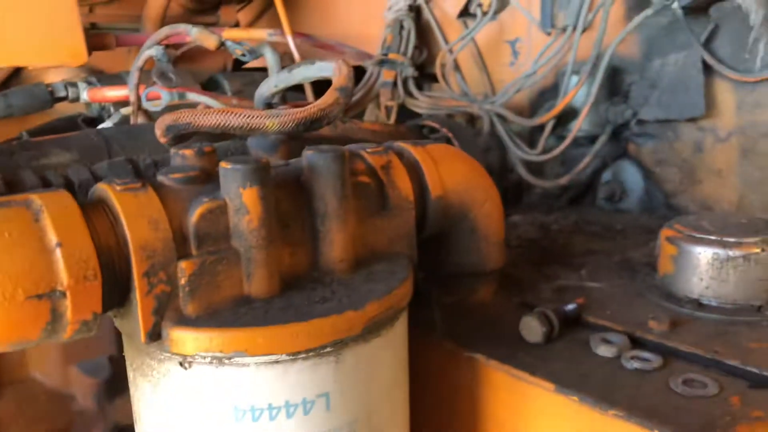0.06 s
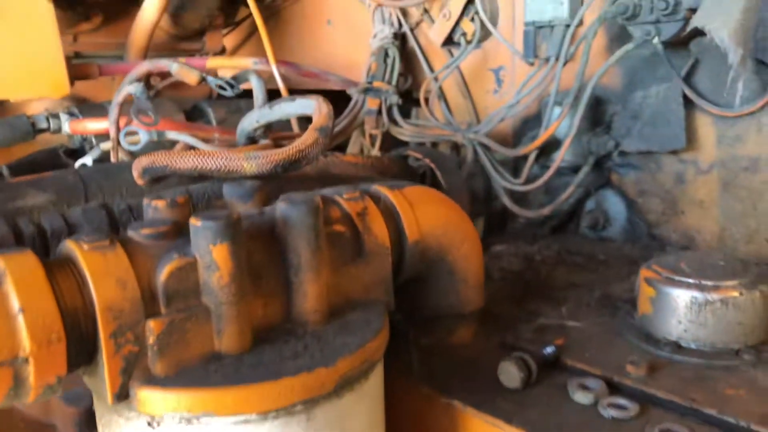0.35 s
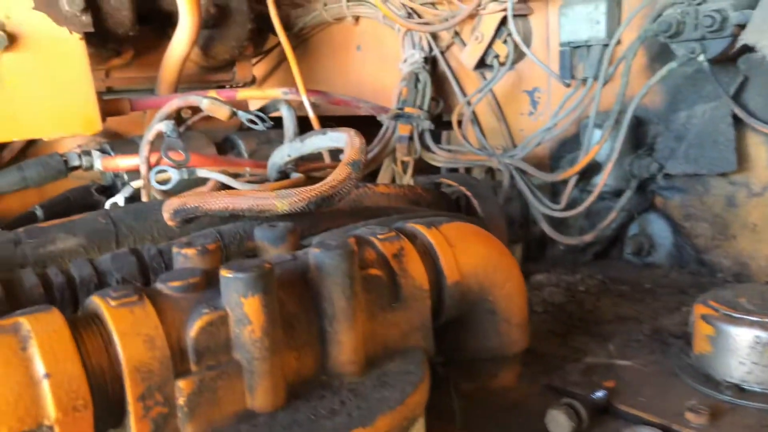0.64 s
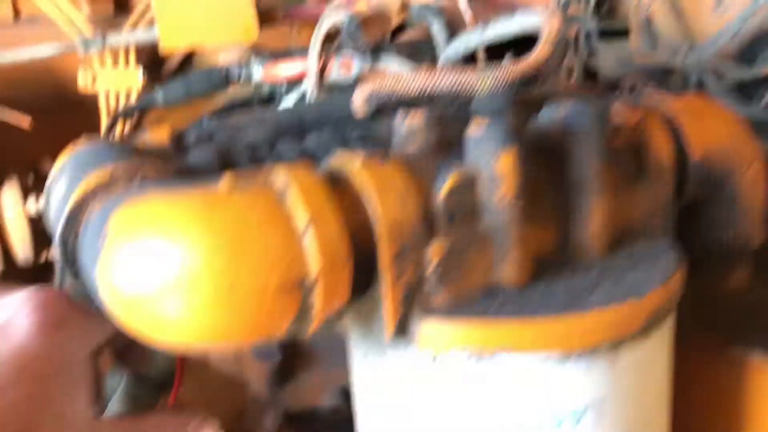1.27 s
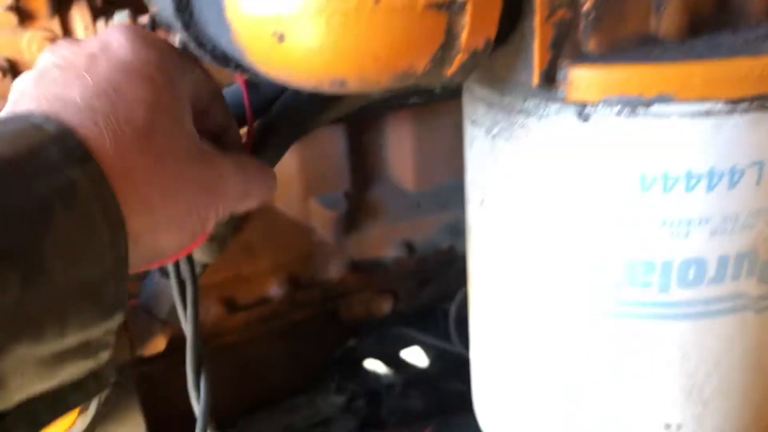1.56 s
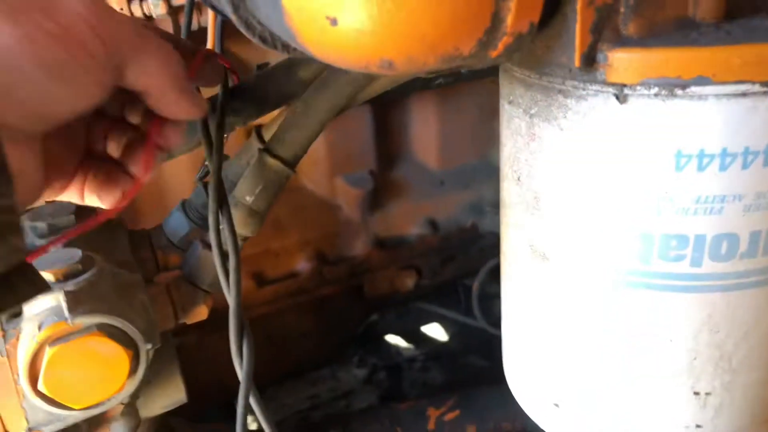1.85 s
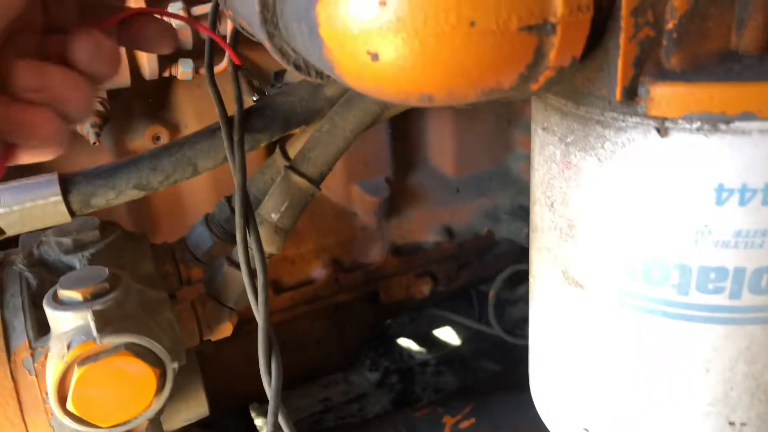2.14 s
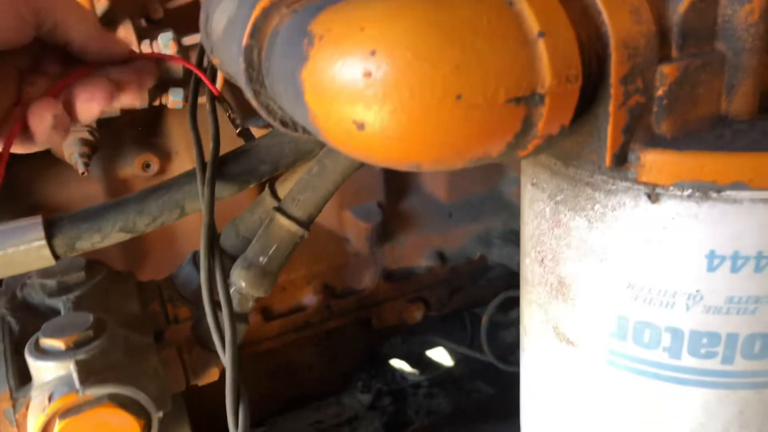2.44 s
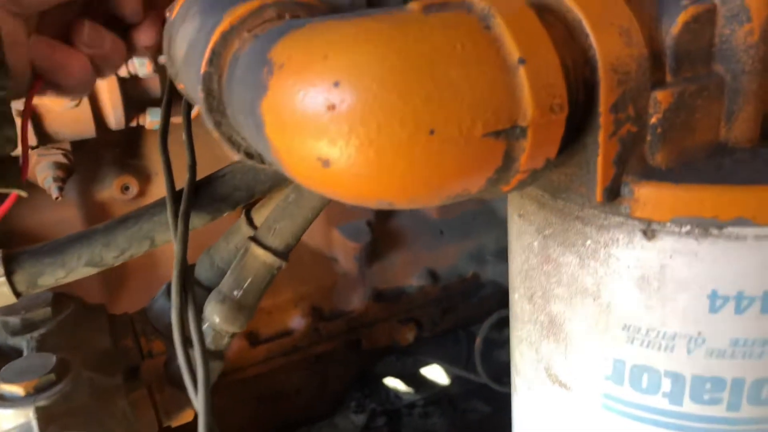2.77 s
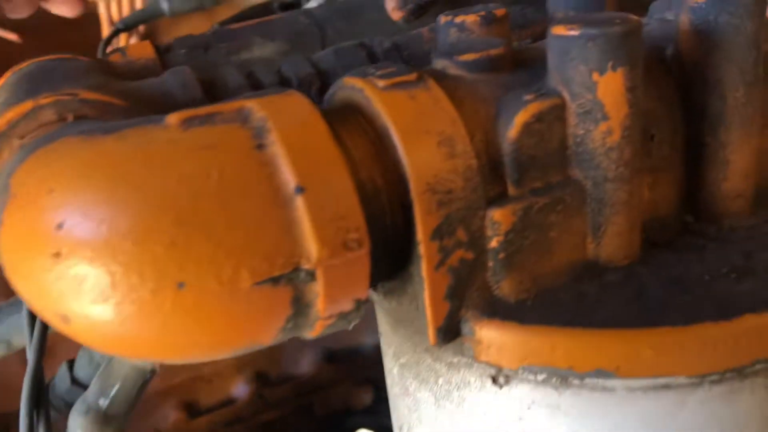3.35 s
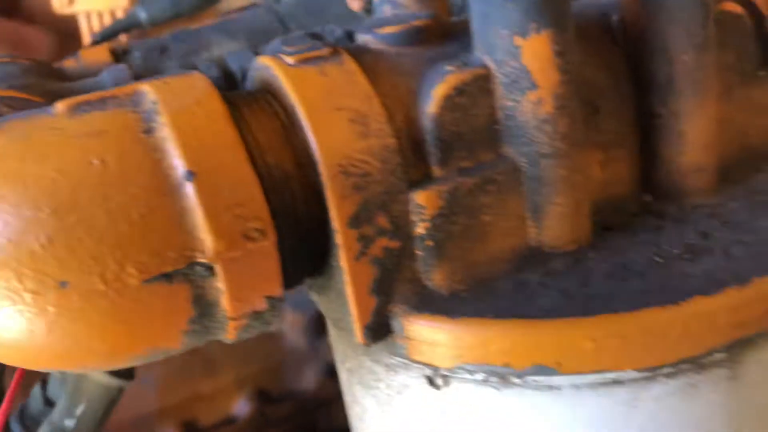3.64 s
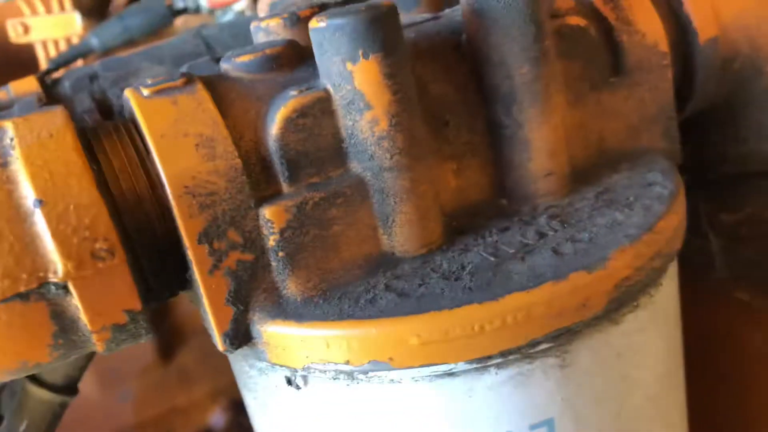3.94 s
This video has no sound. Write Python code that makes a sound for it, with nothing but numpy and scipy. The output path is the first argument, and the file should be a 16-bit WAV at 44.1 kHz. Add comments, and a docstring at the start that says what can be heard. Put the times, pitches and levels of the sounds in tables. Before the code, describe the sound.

A diesel engine idles with a low, wavering drone while a hand makes faint ticks and rustles with wires. Then a loud hiss surges, eases and keeps rushing, heard close up in the open engine bay.

```python
"""A diesel engine drones at a wandering idle in an open bay, heard in mono as the microphone moves about.
Its tones are harmonics of the four-stroke cycle, over rumble, mechanical noise and a faint whine.
A hand fiddles with wires, making faint ticks and rustles. Then a loud jet of broadband hiss swells,
eases and keeps rushing, exciting faint resonances in the surrounding metal."""
import sys
import numpy as np
from scipy import signal
from scipy.fft import rfft, irfft
from scipy.io import wavfile

SR = 44100
rng = np.random.default_rng(int(sys.argv[2]) if len(sys.argv) > 2 else 0)


def output_pcm(signal):
    """Save a mono or channel-first signal as 16-bit PCM at the path in sys.argv[1].

    Samples are clipped to [-1, 1] before scaling.
    """
    pcm = np.clip(np.atleast_2d(signal).T, -1, 1) * 32767
    wavfile.write(sys.argv[1], SR, np.round(pcm).astype(np.int16))


N = 176400
TIME = np.arange(N) / SR
CUTOFF_HZ = 15780


# idle speed: (time [s], four-stroke cycle rate [Hz])
CYCLE_RATE = [(0,9.15),(.3,9.85),(.5,10.22),(.7,10.25),(1.1,10.6),(1.7,11.0),(2.1,11.15),(2.3,11.23),(2.5,11.12),(3.1,10.24),(3.6,10.06),(4,9.9)]

def engine(jitter=0.0021):
    """Periodic excitation: the cycle phase, the integral of speed, times the drone and the firings."""
    cycle_hz = in_time(CYCLE_RATE)[0] * (1 + jitter * drift(6))
    cycle_phase = 2 * np.pi * np.cumsum(cycle_hz) / SR
    return drone(cycle_phase) + rumble() + clatter(cycle_phase)


# orders 8 and 12, the strong overtones of the firing rate: (time [s], level [dB])
ORDER_8_LEVEL = [(0,-66),(.45,-53),(.7,-42.5),(1.1,-45),(1.55,-47.5),(1.85,-32.5),(2.15,-31.5),(2.4,-26),(2.6,-37),(2.82,-31),(3.05,-40.5),(3.35,-32.5),(3.7,-29),(4,-31.5)]
ORDER_12_LEVEL = [(0,-54),(.8,-44),(1,-41),(1.27,-33.5),(1.65,-42.5),(2,-44.5),(2.5,-49),(2.82,-35),(3.1,-41.5),(3.4,-39),(4,-35)]
# weaker orders from uneven cylinders: (order, level at place 0 [dB], at place 1 [dB], at place 2 [dB])
WEAK_ORDERS = [(5,-72,-44,-71),(6,-61,-50.5,-59),(7,-70,-54,-64),(9,-56,-55,-43),(10,-61,-48.5,-45.5),(11,-53,-54.5,-41),(13,-63,-77,-47),(14,-45,-55,-59),(15,-49,-65.5,-48),(16,-65,-65,-46),(17,-70,-63,-59),(22,-70,-66,-71),(24,-65,-74,-66),(25,-67,-73,-66)]
# path of the microphone: (time [s], place [index])
MICROPHONE_PATH = [(0,0.12),(.8,0.46),(1.3,0.82),(2,0.92),(2.6,0.87),(3.25,1.76),(4,2.1)]

def drone(cycle_phase, wander_rad=0.26, waver_hz=2.5):
    """Harmonic series: orders are multiples of the cycle rate; dispersed phases smooth their sum."""
    def harmonic(order, db, waver_db):
        offset = np.pi * order ** 2 / len(WEAK_ORDERS) + wander_rad * drift(waver_hz)
        amplitude = np.sqrt(2) * from_db(db + waver_db * drift(waver_hz))
        return amplitude * np.sin(order * cycle_phase + offset)

    place, = in_time(MICROPHONE_PATH)
    out = harmonic(8, in_time(ORDER_8_LEVEL)[0], waver_db=0.67)
    out += harmonic(12, in_time(ORDER_12_LEVEL)[0], waver_db=0.67)
    for order, *levels in WEAK_ORDERS:
        out += harmonic(order, np.interp(place, [0, 1, 2], levels), waver_db=2.0)
    return out


# spectrum of the rumble before its low-pass: (frequency [Hz], relative level [dB])
RUMBLE_SPECTRUM = [(25,-32),(45,-25),(60,-14),(76,-2.5),(92,-0.5),(120,0),(145,-8),(175,-22),(300,-55)]
# envelope of the rumble: (time [s], level [dB])
RUMBLE_LEVEL = [(0,-41.5),(.6,-39),(1.1,-43.5),(1.8,-48),(2.4,-46),(2.75,-41.5),(3.2,-40),(4,-40)]

def rumble(top_hz=400):
    """Aperiodic vibration: the engine's irregular motion gives a continuous band of bass."""
    low_pass = signal.butter(2, top_hz, fs=SR, output="sos")
    return signal.sosfilt(low_pass, noise(RUMBLE_SPECTRUM)) * from_db(in_time(RUMBLE_LEVEL)[0])


# mechanical noise of the engine: (frequency [Hz], relative level [dB])
CLATTER_SPECTRUM = [(150,-10),(200,-4.5),(222,-6),(243,2),(275,-6),(330,-5),(395,-6),(440,-12.5),(540,-10.5),(590,-14),(750,-12),(840,-17.5),(1500,-17),(2240,-25.5),(2900,-29),(3500,-26.5),(4100,-31.5),(5600,-32),(7400,-40),(15500,-45.5)]

def clatter(cycle_phase, level_db=-54, pulse_db=0.5, low_hz=162):
    """Amplitude modulation: mechanical noise pulses slightly at each of four firings per cycle."""
    carrier = rms_one(high_pass(noise(CLATTER_SPECTRUM), low_hz))
    return carrier * from_db(level_db + pulse_db * np.sin(4 * cycle_phase))


# spectrum of the jet: (frequency [Hz], relative level [dB])
JET_SPECTRUM = [(200,-15),(300,-9.5),(500,-9.5),(750,-7.5),(1250,-5),(1500,-2),(1950,-0.5),(2200,-4.5),(2420,-4),(2700,-4),(3100,-3),(3800,-1.5),(5900,-.5),(8000,-2),(10000,-2.5),(11500,-5),(14000,-3.5),(15500,-3.5)]
# centres of four overlapping bands: (frequency [Hz])
JET_BANDS = [600, 1600, 4800, 11500]
# relative band envelopes: (time [s], low [dB], middle [dB], treble [dB], top [dB])
JET_LEVELS = [(2.27,-99,-90,-87,-88),(2.32,-80,-74,-58,-61),(2.385,-60,-49,-42.5,-36),(2.425,-48,-44.5,-34,-30),(2.5,-36.5,-37,-27.5,-25.5),(2.58,-39,-32,-24.5,-23),(2.64,-33.5,-28.5,-21.5,-21.5),(2.74,-36,-32,-23,-25.5),(2.87,-38,-36,-26.5,-28.5),(3.02,-40.5,-39.5,-32,-38.5),(3.22,-41,-42.5,-38,-38.5),(3.41,-38,-41.5,-38,-33.5),(3.55,-40,-44,-38,-38.5),(3.68,-42,-43.5,-38.5,-38.5),(3.77,-45,-43.5,-36,-37.5),(3.88,-42.5,-44,-38,-37.5),(4,-42,-45,-35.5,-34)]

def jet(low_hz=200, band_gains_db=(8.7, 9.2, 1.65, 2.3), band_waver_db=0.5, flutter_db=0.15):
    """Jet noise: a broadband hiss opens treble first, surges and settles to a weaker flow."""
    spectrum = rfft(engine_bay(high_pass(noise(JET_SPECTRUM), low_hz)))
    log_hz = np.log(np.maximum(np.arange(len(spectrum)) * SR / N, 1))
    out = np.zeros(N)
    for selector, level, gain_db in zip(np.eye(len(JET_BANDS)), in_time(JET_LEVELS), band_gains_db):
        crossfade = np.interp(log_hz, np.log(JET_BANDS), selector)
        band = irfft(spectrum * crossfade, N)
        out += band * from_db(level + gain_db + band_waver_db * drift(20))
    return out * from_db(flutter_db * drift(28))


# modes of the metal rung by the jet: (frequency [Hz], bandwidth [Hz], gain [dB])
METAL_MODES = [(1450,20,-2),(2417,14,1),(3103,12,5),(3386,10,3.5),(3620,12,2.5),(4181,12,1),(5222,20,-3),(5728,20,0),(5962,20,0),(6091,16,0),(6321,12,1),(6819,14,2),(7366,25,-3),(7742,14,1),(8144,14,0),(10190,14,0),(13401,16,0)]

def engine_bay(x, echo_db=-8, decay_s=0.049):
    """Reverberation and resonance: dense reflections and narrow metal modes colour the sound; rms 1."""
    age = TIME[:SR // 5]
    echoes = rng.standard_normal(len(age)) * np.exp(-age / decay_s)
    out = x + from_db(echo_db) * signal.fftconvolve(x, echoes / np.linalg.norm(echoes))[:N]
    for hz, width_hz, db in METAL_MODES:
        radius = np.exp(-np.pi * width_hz / SR)
        feedforward = (1 - radius ** 2) / 2 * np.array([1, 0, -1])
        feedback = [1, -2 * radius * np.cos(2 * np.pi * hz / SR), radius ** 2]
        out += from_db(db) * signal.lfilter(feedforward, feedback, x)
    return rms_one(out)


# sleeve and wires rubbing: (time [s], level [dB])
RUB_LEVEL = [(0,-77),(.8,-75),(1.2,-71),(1.55,-69),(1.8,-66.5),(2.08,-66),(2.15,-80),(2.22,-65.5),(2.4,-80),(2.6,-80)]
# ticks and brushes: (peak time [s], level [dB], attack [s], decay [s], tilt [dB/octave])
TOUCHES = [(.018,-47.5,0.0046,0.021,-7.5),(.738,-57.5,.002,0.0082,-3.5),(.922,-66,.008,.018,-1),(1.036,-66,.004,.016,-2),(1.2,-68,.03,.04,1),(1.375,-71,.005,0.016,-1),(1.53,-69,.02,.035,4),(1.708,-63,.006,.016,1.5),(1.839,-61,.001,.005,0),(1.906,-56,.001,.006,0),(1.929,-54.5,0.016,0.019,2),(2.04,-70,.015,.025,3),(2.095,-53.5,0.0042,0.013,2),(2.262,-61,.006,0.022,2.5)]
# spectra of the rubbing and the touches: (frequency [Hz], relative level [dB])
RUB_SPECTRUM = [(1000,-15),(3000,5.5),(5500,1),(7500,-1),(12000,-3.5),(15500,-5)]
TOUCH_SPECTRUM = [(300,-27),(1000,1.5),(3000,-0.5),(6000,0.5),(9000,-1.5),(12500,-6),(15000,3)]

def wire_handling(grain_db=1.5, rub_swing_db=2.5):
    """Friction and impact: sliding wires rustle unevenly, and brief contacts give bursts of noise."""
    out = noise(RUB_SPECTRUM) * from_db(in_time(RUB_LEVEL)[0] - rub_swing_db * drift(10))
    grain = from_db(grain_db * drift(300))
    for peak_s, db, attack_s, decay_s, tilt_db in TOUCHES:
        age = TIME - peak_s
        envelope = np.exp(-np.maximum(-age / attack_s, age / decay_s).clip(0, 30))
        out += from_db(db) * envelope * grain * noise(TOUCH_SPECTRUM, tilt_db)
    return out


# thin tones of the machinery: (frequency [Hz], relative level [dB])
WHINE_TONES = [(773,-65.5),(1152,-72),(890,-74),(388,-68),(533,-76)]
# their common envelope: (time [s], gain [dB])
WHINE_GAIN = [(0,-11),(.2,-1.5),(.55,-1.5),(.9,-4.5),(1.2,1),(1.5,-8.5),(4,-14)]

def whine(waver_db=3, pitch_wander=0.0043):
    """Random modulation: faint machinery tones waver in amplitude and frequency."""
    tones = np.zeros(N)
    for hz, db in WHINE_TONES:
        amplitude = np.sqrt(2) * from_db(db + waver_db * drift(4.2))
        pitch_hz = hz * (1 + pitch_wander * drift(7.3))
        tones += amplitude * np.sin(2 * np.pi * np.cumsum(pitch_hz) / SR)
    return tones * from_db(in_time(WHINE_GAIN)[0])


def from_db(db):
    """Decibel law: 20 dB is a factor of ten in amplitude."""
    return 10 ** (np.asarray(db) / 20)


def rms_one(x):
    """Normalisation to rms 1."""
    return x / np.sqrt(np.mean(x ** 2) + 1e-20)


def in_time(rows):
    """Linear interpolation of each column of a time curve, at every sample."""
    times, *columns = np.transpose(rows)
    return [np.interp(TIME, times, column) for column in columns]


def drift(corner_hz, step=40, settle=2000):
    """Low-pass filtering turns white noise into a random wander of rms 1."""
    pole = np.exp(-2 * np.pi * corner_hz * step / SR)
    white = rng.standard_normal(N // step + settle + 2)
    slow = signal.lfilter([1], [1, -2 * pole, pole ** 2], white)[settle:]
    return np.interp(np.arange(N) / step, np.arange(len(slow)), rms_one(slow))


def noise(spectrum, tilt_db=0):
    """Spectral shaping of white noise, with a tilt per octave above 1 kHz; rms 1."""
    hz = np.maximum(np.arange(N // 2 + 1) * SR / N, 1)
    points_hz, points_db = np.transpose(spectrum)
    db = np.interp(np.log(hz), np.log(points_hz), points_db)
    db += tilt_db * np.log2(np.maximum(hz, 1000) / 1000)
    gain = from_db(db) * (hz < CUTOFF_HZ)
    return rms_one(irfft(rfft(rng.standard_normal(N)) * gain, N))


def high_pass(x, hz):
    """Fourth-order filtering attenuates the bass."""
    return signal.sosfilt(signal.butter(4, hz, "high", fs=SR, output="sos"), x)


def scene():
    """Superposition: all sources add, alike in both channels."""
    return np.tile(engine() + jet() + wire_handling() + whine(), (2, 1))


def record(dry):
    """Band limiting: a steep elliptic low-pass removes the highest treble."""
    return signal.sosfilt(signal.ellip(12, .1, 80, CUTOFF_HZ, fs=SR, output="sos"), dry)


dry = scene()
out = record(dry)
output_pcm(out)
```